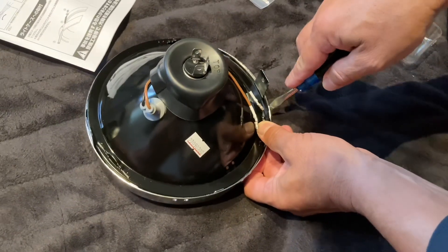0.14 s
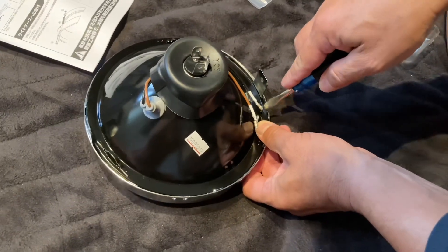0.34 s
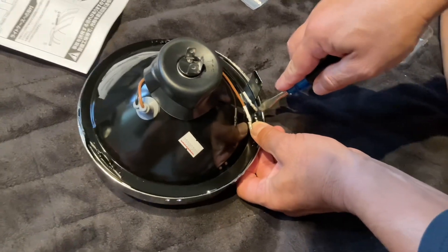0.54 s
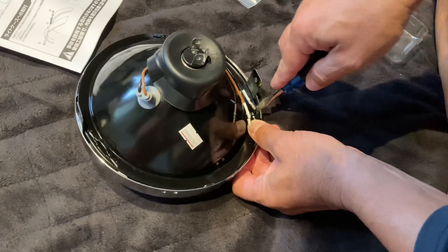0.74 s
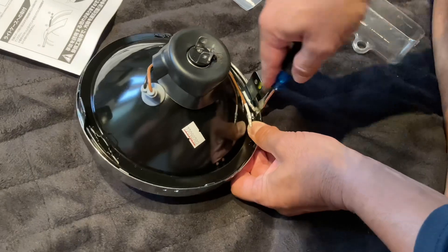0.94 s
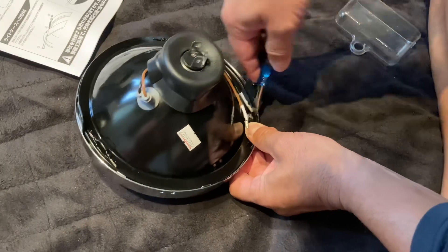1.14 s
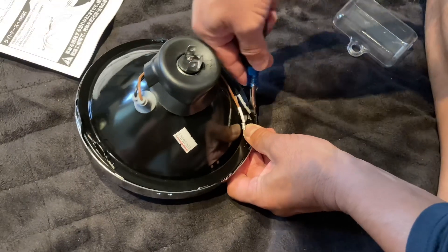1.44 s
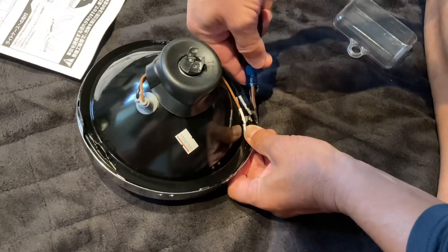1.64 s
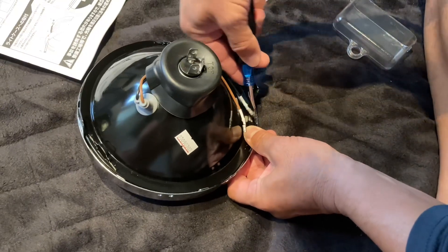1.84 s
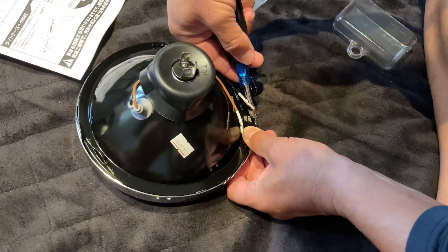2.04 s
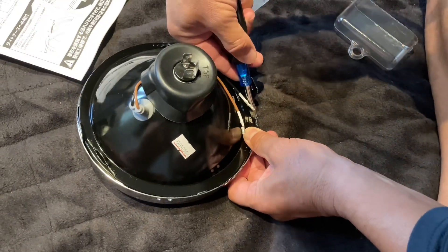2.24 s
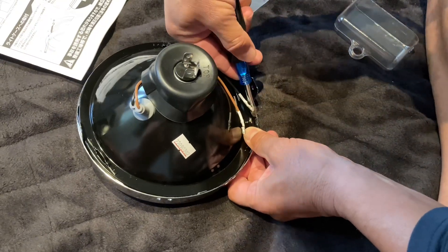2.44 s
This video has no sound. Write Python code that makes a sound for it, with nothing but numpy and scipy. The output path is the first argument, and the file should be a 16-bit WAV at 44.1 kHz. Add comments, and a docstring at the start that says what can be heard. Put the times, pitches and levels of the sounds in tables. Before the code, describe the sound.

Metal tabs are pried with a screwdriver in two gritty, clicking bursts, then only faint ticks

```python
"""A low wavering hum and a faint hiss fill a small room, while hands rub softly on a blanket.
Then a flat screwdriver pries thin metal tabs on the rim of a lamp housing that lies on the blanket.
The scraping blade makes dense tiny catches; each slip is a short burst. Both ring the housing and tabs.
Dull thuds come from the housing bumping the blanket. Hiss and rubbing are shaped noise; hums are sines."""
import sys
import numpy as np
from scipy import signal
from scipy.fft import rfft, irfft
from scipy.io import wavfile
from scipy.ndimage import uniform_filter1d

SR = 44100
rng = np.random.default_rng(int(sys.argv[2]) if len(sys.argv) > 2 else 0)


def undo_db(level):
    """Turn decibels back into plain size, where 20 dB means ten times bigger."""
    steps = np.asarray(level, float) / 20
    return 10 ** steps


def unload_wav(signal):
    """Save mono or channel-first audio to the path in sys.argv[1] as 16-bit WAV at rate SR, clipped to [-1, 1]."""
    wavfile.write(
        sys.argv[1],
        SR,
        np.round(np.clip(np.atleast_2d(signal).T, -1, 1) * 32767).astype(np.int16),
    )


N = 114660  # length in samples

# Hiss of the room, its relative loudness by pitch: pitch_hz, level_db
AIR_COLOUR = [(15, -59), (30, -30.5), (55, -16), (66, -21.5), (85, -6), (100, -10), (120, -15.5),
              (140, -16.5), (170, -19.5), (230, -28), (400, -28), (600, -39), (1000, -45), (2000, -50),
              (3000, -51), (8000, -57.5), (11500, -57.5), (15000, -65.5), (16500, -76.5)]
# How alike left and right are, for hiss, rubbing and room tail: pitch_hz, likeness (0 to 1)
LIKENESS = [(60, .88), (200, .82), (380, .6), (700, .2), (3000, .2), (6000, .6), (8500, .98), (16000, .99)]
# Lower hum, wavering in strength: time_s, level_db
LOW_HUM_LEVEL = [(0.0, -67), (0.049, -40.5), (0.25, -58), (0.33, -37.5), (0.609, -74), (0.719, -41.5),
                 (0.93, -70.5), (1.03, -45.5), (1.23, -53), (1.4, -43.5), (1.59, -62.5), (1.658, -34.5),
                 (1.769, -50.5), (2.03, -41), (2.22, -80), (2.349, -36), (2.42, -53.5), (2.6, -45.5)]
# Upper hum, coming and going: time_s, level_db
UPPER_HUM_LEVEL = [(0.0, -56.5), (0.43, -46), (0.51, -78), (0.572, -41.5), (0.61, -57.5), (1.48, -49),
                   (1.51, -62), (1.95, -45), (2.28, -60.5), (2.32, -50.5), (2.5, -63.5), (2.6, -43)]
# Strength of the hands shifting on the blanket: time_s, level_db
RUB_LEVEL = [(0, -67.5), (.1, -61), (.55, -66), (.75, -75.5), (1.5, -89.5), (1.62, -60), (1.72, -63.5),
             (1.82, -74), (1.95, -58.5), (2.07, -69.5), (2.15, -80), (2.44, -79), (2.52, -48.5), (2.6, -62)]
# Relative loudness of the rubbing by pitch: pitch_hz, level_db
RUB_COLOUR = [(130, -37.5), (250, 2), (600, -1.5), (1000, 2.5), (2200, 2.5), (3000, -13.5), (5000, -30),
              (9000, -20.5), (16000, -30)]
# Ringing modes of the metal, before each contact varies them: pitch_hz, relative_level_db, t60_s
# (t60 is the time to fade by 60 dB)
METAL_MODES = [(655, -6.5, 0.005), (764, -1.5, 0.033), (909, -9, 0.065), (1087, -6, 0.038),
               (1415, 0, 0.012), (1734, -5, 0.026), (2043, -2.5, 0.045), (2364, 4, 0.015),
               (2627, 0.5, 0.02), (3413, -2, 0.0062), (3768, -10, 0.029), (4094, -7.5, 0.015),
               (4400, -11.5, 0.058), (4800, -15.5, 0.0042), (7040, -6, 0.0046), (7800, -3, 0.0063),
               (8504, -1.5, 0.03), (10284, -2, 0.0027), (12220, -4.5, 0.015), (13850, -10.5, 0.0031)]
# Pressure of the scraping blade: time_s, level_db
SCRAPE_PRESSURE = [(.16, -70.5), (.2, -53.5), (.24, -44.5), (.33, -96), (.38, -69), (.41, -41.5),
                   (.46, -42), (.55, -55), (.62, -99), (.89, -82.5), (.92, -41.5), (.99, -42.5),
                   (1.04, -50), (1.12, -54.5), (1.2, -64), (1.3, -101), (2.24, -75.5), (2.28, -57),
                   (2.32, -44), (2.35, -65.5), (2.42, -75.5)]
# Slips of the blade, before the low cut, side balance and room; shares are relative to the tabs:
# start_s, tab_peak_db, housing_share_db, edge_share_db, force_decay_ms
SLIPS = [(0.1649, -20.5, -8.5, -9.5, 4.5), (0.2149, -27, 0, -10.5, 2.8), (0.2251, -21.5, -2, -8, 1.5),
         (0.2274, -16, -31.5, -7.5, 2.5), (0.269, -28.5, -12.5, -16, 2.5), (0.3051, -32, -15, -13.5, 0.7),
         (.390, -12.5, -10.5, 0.5, 2.4), (0.4227, -17.5, -18.5, -15.5, 2), (0.4304, -6, -13, -1.5, 1.1),
         (0.4504, -22, -35, 2, 1.6), (0.4707, -26, -27, -9.5, 2.6), (0.481, -32.5, -21.5, -25, 0.5),
         (0.4967, -37.5, -19, -11.5, 3), (0.518, -12, -25, -2.5, 0.56), (0.5378, -30.5, -10, -16, 0.91),
         (0.9053, -30, -13.5, -10.5, 0.72), (0.9168, -27.5, -8.5, -4.5, 0.88),
         (0.931, -21, -10.5, -15, 0.71), (0.9413, -24, -7.5, -14, 2.3), (.954, -25, -25, -10.5, 1.4),
         (0.9631, -28, -2, -15, 1.7), (0.9837, -28, -6, -6.5, 1.7), (0.9918, -17.5, -9, -21, 0.35),
         (1.0015, -15.5, -18.5, -10, 0.72), (1.0043, -2, -11, -16.5, 0.92), (1.0788, -6.5, -14, -3.5, 1.2),
         (1.147, -33, -9.5, -14, 4.7), (1.2509, -41, -35, -2, 1.98), (1.9375, -48, -13.5, -16, 1.4),
         (1.9945, -45, -12, -1, 4.8), (2.040, -49, -14, -11, 3.5), (2.282, -42, -23, -28.5, 5),
         (2.31, -36, -23, -9.5, 2.4), (2.3186, -35.5, 1, -5.5, 1.47), (2.322, -31.5, -23, -14, 7.4),
         (2.5045, -34, -10.5, -15.5, 4.1)]
# How much louder the right side is than the left, one value each for housing, tabs, edges: right_db
METAL_RIGHT_DB = (1.5, 4.5, .5)
# Housing bumping the blanket, level before the soft start: start_s, level_db, pitch_hz
THUDS = [(0.2312, -26.5, 342), (0.4305, -25.5, 360), (1.0067, -24.5, 371.3), (1.078, -22.5, 394),
         (2.5042, -39, 362)]
# How long the room tail takes to fade by 60 dB: pitch_hz, t60_s
ROOM_FADE = [(300, 0.39), (1000, 0.29), (3000, .2), (8000, 0.17), (15000, .12)]
# How late the left port hears everything: pitch_hz, lag_cycles
LEFT_LAG = [(0, 0), (900, .22), (1450, .5), (2300, 1), (4600, 2), (8100, 3), (11400, 4), (14750, 5),
            (22050, 7.2)]

AIR_DB, AIR_RIGHT_DB = -45.5, 1  # hiss level; right over left for hiss and hums
LOW_HUM_HZ, UPPER_HUM_HZ, HUM_DRIFT_HZ = 82.2, 121.9, 1.5  # drift is an rms value
RUB_RIGHT_DB = 3  # right over left
HOUSING_TOP_HZ, EDGE_FROM_HZ = 1150, 6000  # housing modes lie below, edge modes above; tabs between
BEND_SHARE, SPLIT_SHARE = .015, .04  # random retuning, as a share of pitch: all modes together, each alone
SPOT_DB, PORT_DB = 1.5, 3.5  # random weight of each mode, and of each mode at each port
GRAINS_PER_S, GRAIN_SPREAD_DB = 2600, 3.5  # average number of catches; spread of their sizes
SCRAPE_HOUSING_DB, SCRAPE_EDGE_DB = -3, -11.5  # relative to the tabs
RISE_SHARE = .45  # rise time of the force as a share of its decay time
METAL_LOW_HZ, TOP_HZ = 600, 16500  # low cut of the metal, treble limit of the ports
THUD_T60_S, THUD_RISE_S = 0.024, .0015
ROOM_DB, ROOM_GAP_MS = -15, 3  # tail strength; wait before the tail


def evened(x):
    """Scales a signal to an rms of one."""
    return x / np.sqrt(np.mean(x ** 2) + 1e-20)


def read(points, hz):
    """Reads a table between its points, along a logarithmic pitch scale."""
    f, value = np.transpose(points)
    return np.interp(np.log(hz + 1), np.log(f + 1), value)


def curve(rows):
    """Turns a table of times and levels in dB into a gain for every sample."""
    t, db = np.transpose(rows)
    return undo_db(np.interp(np.arange(N) / SR, t, db))


def two_sides(right_db):
    """Left and right gains that make the right side louder by right_db."""
    return undo_db(right_db * np.array([[-.5], [.5]]))


def blend(left, other, hz):
    """Pairs a left spectrum with a right one that shares part of it at each pitch."""
    same = read(LIKENESS, hz)[:, None]
    return np.array([left, same * left + np.sqrt(1 - same ** 2) * other])


def noise(colour, patchy_db):
    """Two-channel noise from random short-time spectra with drifting louder and softer patches."""
    frames, hz = N // 512 + 5, np.fft.rfftfreq(2048, 1 / SR)
    a, b, c, d, patches = rng.standard_normal((frames, 1025, 5)).T
    patches = uniform_filter1d(patches, size=16, axis=0)  # smooth along pitch
    patches = evened(uniform_filter1d(patches, size=6, axis=1))  # smooth along time
    spectra = blend(a + 1j * b, c + 1j * d, hz)
    spectra = spectra * undo_db(read(colour, hz)[:, None] + patchy_db * patches)
    return evened(signal.istft(spectra, nperseg=2048, noverlap=1536)[1][:, :N])


def hiss():
    """Faint room noise, stronger in the bass, with a gently uneven surface."""
    return undo_db(AIR_DB) * noise(AIR_COLOUR, patchy_db=3.5)


def hum(hz, rows):
    """A narrow low tone: a sine whose pitch drifts slowly and whose strength follows a table."""
    drift = evened(uniform_filter1d(rng.standard_normal(N), size=8000))
    cycles = np.cumsum(hz + HUM_DRIFT_HZ * drift) / SR
    return np.sqrt(2) * curve(rows) * np.sin(2 * np.pi * cycles)  # root 2 makes the level an rms


def rub():
    """Hands shifting on the blanket: soft shaped noise that swells and fades."""
    return curve(RUB_LEVEL) * noise(RUB_COLOUR, patchy_db=2.5) * two_sides(RUB_RIGHT_DB)


def part_rings():
    """Ringing (port, part, time) at one contact: bent metal retunes, each mode becomes a cluster of six."""
    hz, db, t60 = np.repeat(METAL_MODES, repeats=6, axis=0).T
    bend, split, spot, left, right, phase = rng.standard_normal((6, len(hz)))
    part_number = (hz > HOUSING_TOP_HZ).astype(int) + (hz > EDGE_FROM_HZ)
    in_part = np.arange(3)[:, None] == part_number  # housing, tabs, edges
    t = np.arange(3000)[:, None] / SR
    tuned_hz = hz * (1 + BEND_SHARE * bend[0] + SPLIT_SHARE * split)
    onset = 1 - np.exp(-t / 0.000099)
    fade = undo_db(db + SPOT_DB * spot - 60 * t / t60) / np.sqrt(t60)
    modes = onset * fade * np.sin(2 * np.pi * tuned_hz * t + np.pi * phase)
    port_gains = undo_db(PORT_DB * np.array([left, right]))[:, None]
    rings = (in_part * port_gains) @ modes.T
    return rings / np.linalg.norm(rings, axis=2, keepdims=True)


def scrape(spots=8):
    """Dense tiny catches of the blade under changing pressure, each ringing one of several contact spots."""
    size = undo_db(GRAIN_SPREAD_DB * np.minimum(rng.exponential(1, N), 4))
    size = size * rng.choice([-1., 1.], N)
    catches = rng.random(N) < GRAINS_PER_S / SR
    grains = evened(size * catches) * curve(SCRAPE_PRESSURE)
    spot = rng.integers(0, spots, N)
    rung = np.zeros((2, 3, N))
    for k in range(spots):
        force = (grains * (spot == k))[None, None]
        rung += signal.oaconvolve(force, part_rings(), axes=2)[:, :, :N]
    return rung * undo_db(np.array([[SCRAPE_HOUSING_DB], [0], [SCRAPE_EDGE_DB]]))


def slips():
    """Each slip is a rough burst of force that rings housing, tabs and edges, each to its own peak."""
    out, t_ms = np.zeros((2, 3, N + 10000)), np.arange(2000) * 1000 / SR
    for start_s, db, housing_db, edge_db, decay_ms in SLIPS:
        rise = np.minimum(t_ms / (RISE_SHARE * decay_ms), 1) ** 2
        force = rise * np.exp(-t_ms / decay_ms) * rng.standard_normal((1, 3, 2000))
        sound = signal.fftconvolve(force, part_rings(), axes=2)
        sound = sound / abs(sound).max(axis=2, keepdims=True)
        at = round(start_s * SR)
        peaks = undo_db(db + np.array([[housing_db], [0], [edge_db]]))
        out[:, :, at:at + sound.shape[2]] += peaks * sound
    return out[:, :, :N]


def metal():
    """Slips and scraping without their lowest bass, the three parts summed with their own side balance."""
    low_cut = signal.butter(3, METAL_LOW_HZ, "hp", fs=SR, output="sos")
    parts = signal.sosfilt(low_cut, slips() + scrape())
    tilt = undo_db(np.array(METAL_RIGHT_DB)[:, None] / 2)
    return np.array([(parts[0] / tilt).sum(0), (parts[1] * tilt).sum(0)])


def thuds():
    """The housing bumps the blanket: short dull sine rings with a soft start."""
    out, t = np.zeros(N + 4000), np.arange(4000) / SR
    for start_s, db, hz in THUDS:
        shape = undo_db(db - 60 * t / THUD_T60_S) * (1 - np.exp(-t / THUD_RISE_S))
        out[round(start_s * SR):][:4000] += shape * np.sin(2 * np.pi * hz * t)
    return out[:N]


def room(x):
    """Adds a tail of sparse echoes of random sign; each band dies at its own speed, alike in the treble."""
    taps = np.zeros((2, SR // 2))
    slots = np.arange(0, SR // 2 - 20, 20)
    at = slots + rng.integers(0, 20, (2, len(slots)))  # one echo in every 20 samples
    np.put_along_axis(taps, at, rng.choice([-1., 1.], at.shape), 1)
    hz, t, (left, other) = signal.stft(taps, SR, nperseg=256)
    fade = undo_db(-60 * t / read(ROOM_FADE, hz)[:, None])
    tail = signal.istft(blend(left, other, hz) * fade, SR, nperseg=256)[1]
    tail = np.pad(tail, ((0, 0), (round(ROOM_GAP_MS * SR / 1000), 0)))
    tail = tail / np.linalg.norm(tail[0])
    return x + undo_db(ROOM_DB) * signal.fftconvolve(x, tail, axes=1)[:, :N]


def scene():
    """Mixes the metal and thuds, which alone pass through the room, with the rubbing, hiss and hums."""
    struck = metal() + thuds()
    rubbing = rub()
    air = hiss() + hum(LOW_HUM_HZ, LOW_HUM_LEVEL) + hum(UPPER_HUM_HZ, UPPER_HUM_LEVEL)
    return room(struck) + rubbing + air * two_sides(AIR_RIGHT_DB)


def top_cut(x):
    """Nothing passes above the cut-off."""
    return signal.sosfilt(signal.butter(12, 16780, fs=SR, output="sos"), x)


def record(dry):
    """Two microphone ports a little apart, the left one hearing late, with a steep treble limit."""
    hz = np.fft.rfftfreq(2 * N, 1 / SR)
    lag = np.exp(-2j * np.pi * np.interp(hz, *np.transpose(LEFT_LAG)))
    delays = np.array([lag, np.ones(len(hz))])
    treble_limit = 1 / (1 + (hz / TOP_HZ) ** 40)
    ports = irfft(rfft(dry, 2 * N) * delays * treble_limit, 2 * N)[:, :N]
    return top_cut(ports)


dry = scene()
out = record(dry)
unload_wav(out)
```